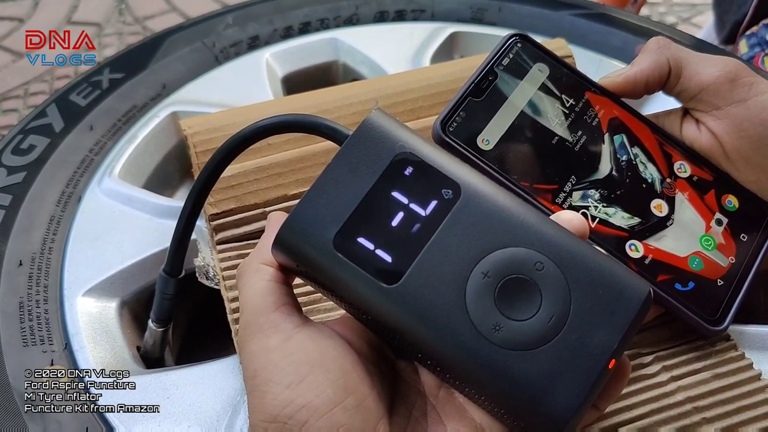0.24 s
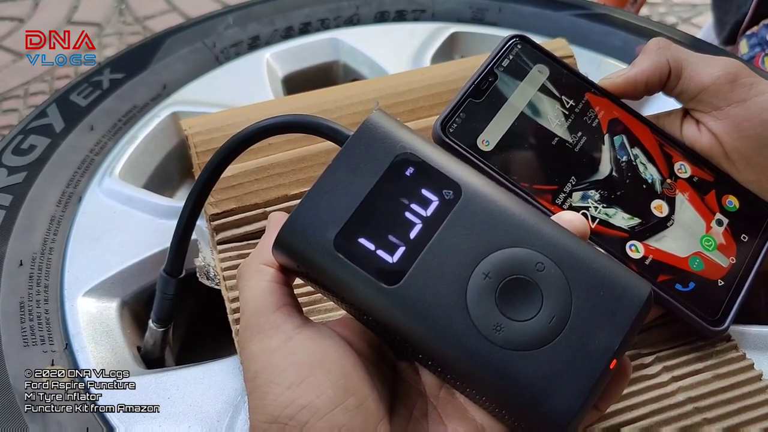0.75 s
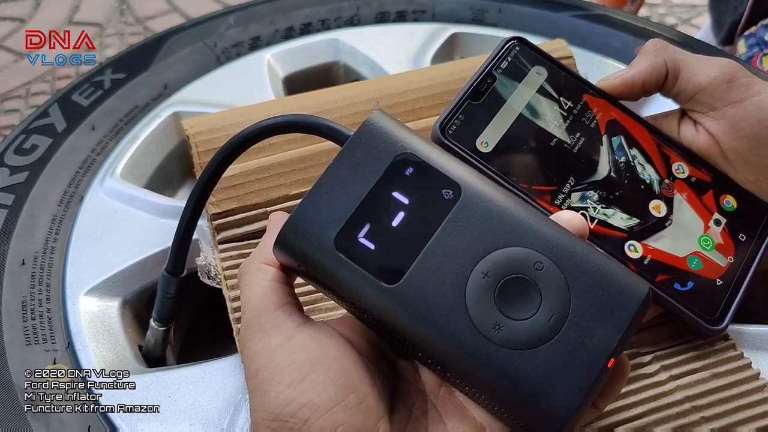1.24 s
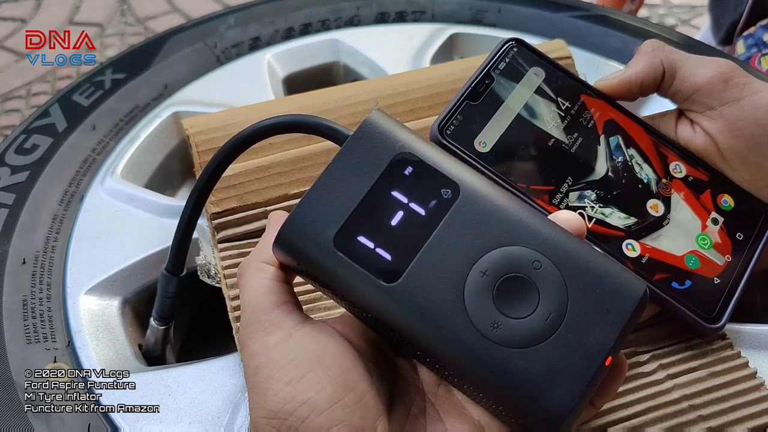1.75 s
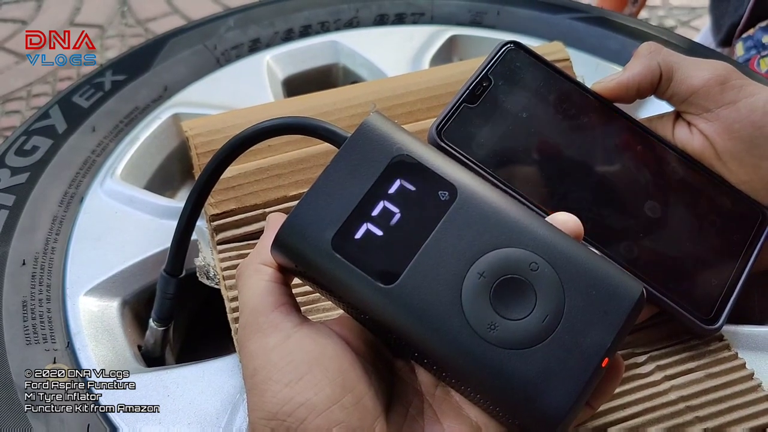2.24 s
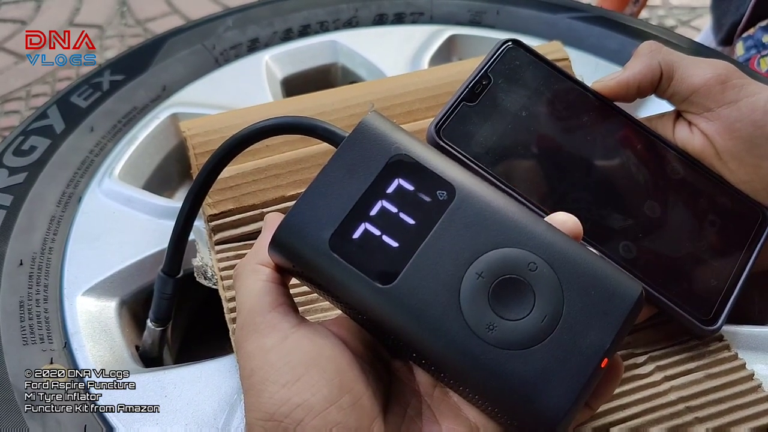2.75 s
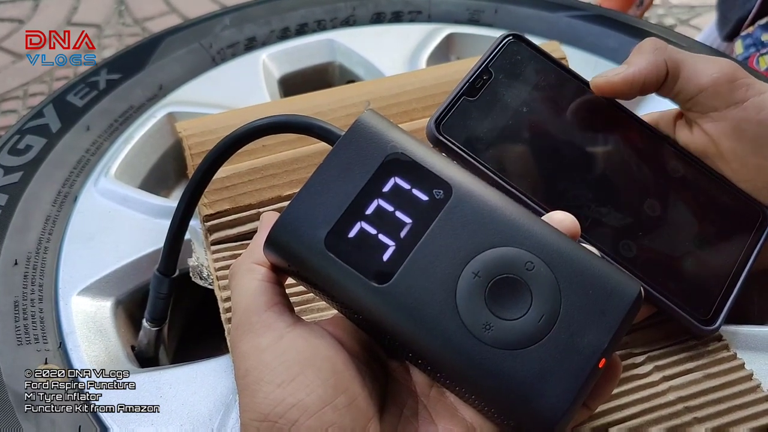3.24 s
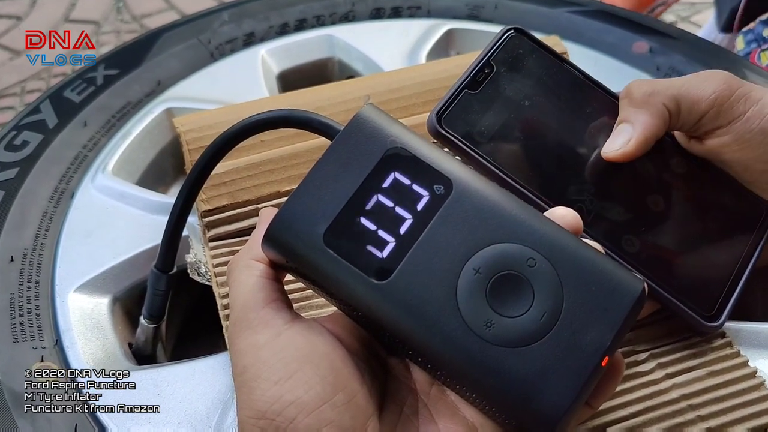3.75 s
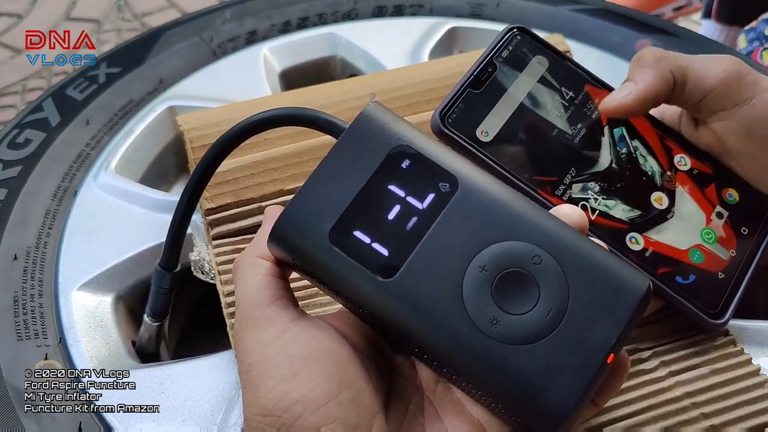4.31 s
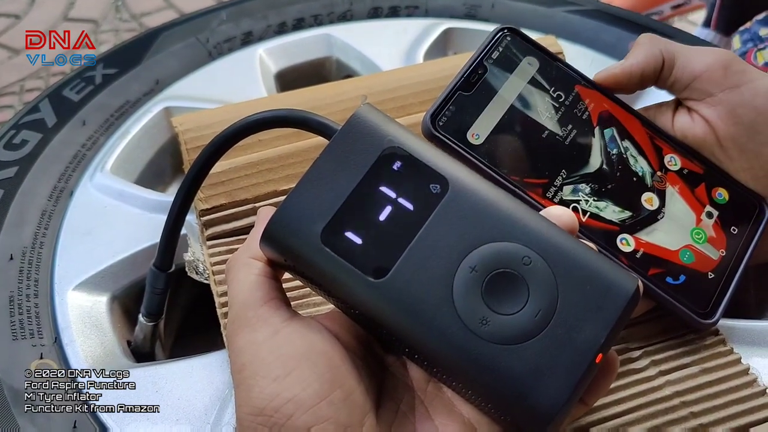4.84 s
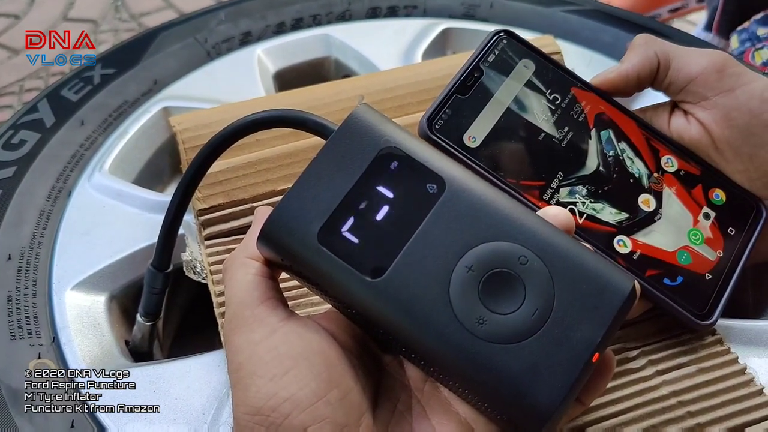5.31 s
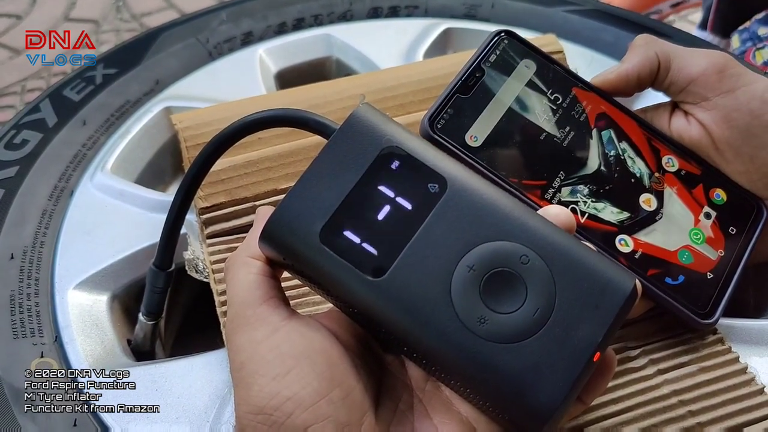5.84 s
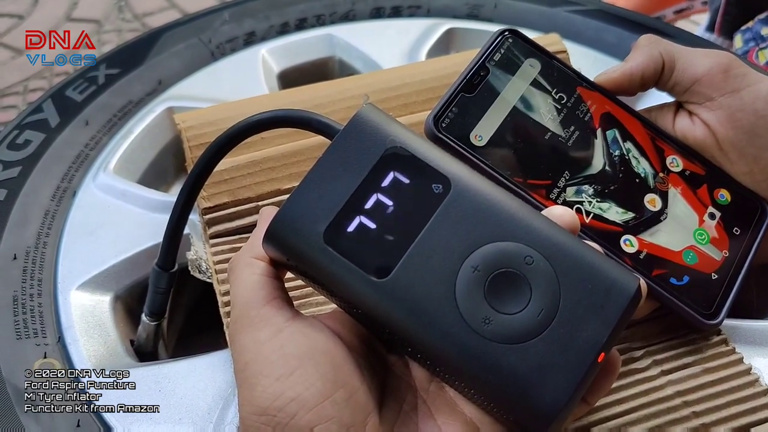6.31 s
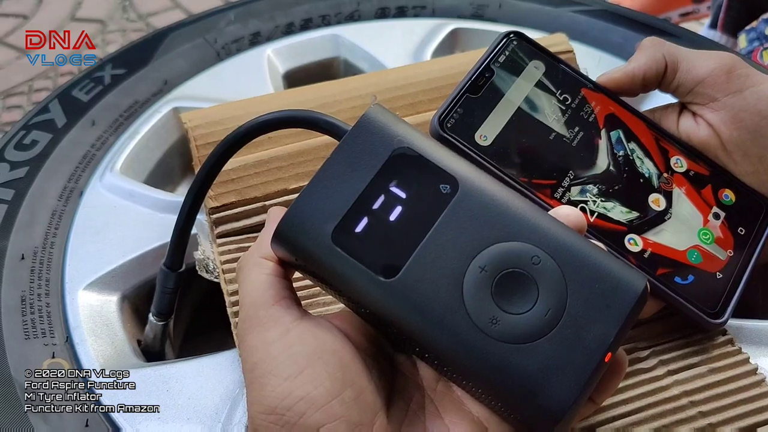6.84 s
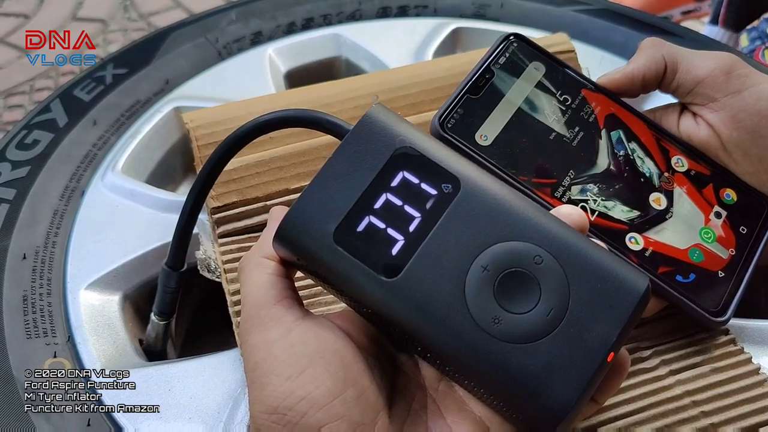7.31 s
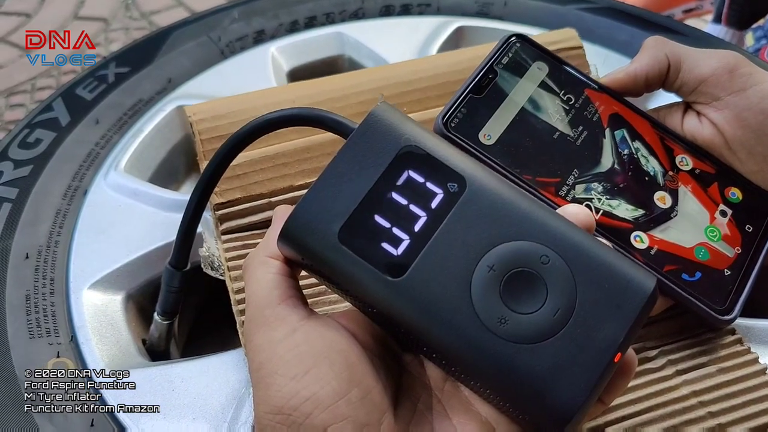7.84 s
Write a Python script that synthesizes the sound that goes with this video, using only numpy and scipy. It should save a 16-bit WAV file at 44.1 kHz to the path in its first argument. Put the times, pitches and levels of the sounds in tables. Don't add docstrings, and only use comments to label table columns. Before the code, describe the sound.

From 0 to 8 seconds a small hand-held tyre pump runs continuously, close to a stereo phone microphone in an open street. About thirty-two strokes a second fuse into a rough, nasal, rattling buzz. Every stroke has a fluttering reed that swells and drops in pitch, a sputtering wheeze of air, then a sharp valve slap with small bounces ringing a plastic case, brightest around two kilohertz. A faint low motor whine wavers beneath. The speed is almost fixed; the level rises noticeably until about 4 seconds, then a little more to the end. Far behind, an engine idles in the first half second, low exhaust hums pass near 1, 3.6, 5.9 and 7.4 seconds, and dull traffic rumble swells around 3, 5 and 6.5 to 8 seconds. The hiss is wide and grainy, with phone compression and no clear echo. It never stops.

```python
import sys
import numpy as np
from scipy import signal
from scipy.fft import rfft, irfft, next_fast_len
from scipy.io import wavfile
from scipy.ndimage import uniform_filter1d

SR = 44100
rng = np.random.default_rng(int(sys.argv[2]) if len(sys.argv) > 2 else 0)


def boost(x):
    u = np.asarray(x, float) / 20
    return 10 ** u


def wrap_up_sound(samples):
    columns = np.atleast_2d(samples).T
    tamed = np.clip(columns, -1, 1)
    steps = np.round(tamed * 32767).astype(np.int16)
    wavfile.write(sys.argv[1], SR, steps)


N = 355887

# (time [s], position [turns])
CRANK = [(0, 0.521), (1.8968, 61), (2.2737, 73), (2.6514, 85), (3.4081, 109), (3.786, 121), (4.5407, 145),
         (5.2969, 169), (6.8065, 217), (8.08, 257.538)]


def in_time(rows):
    s, *columns = np.transpose(rows)
    return [np.interp(np.arange(N) / SR, s, c) for c in columns]


def drift(rate, count):
    steps = int(N / SR * rate * 2) + 2
    place = np.linspace(0, steps - 1, N)
    chance = rng.standard_normal((count, steps))
    return np.array([np.interp(place, np.arange(steps), row) * 1.11 for row in chance])


def outside(start, length):
    t = np.arange(N) / SR
    return np.maximum(start - t, 0), np.maximum(t - start - length, 0)


def ring(clicks, hz, t60):
    r = boost(-60 / (t60 * SR))
    w = 2 * np.pi * hz / SR
    return signal.lfilter([0, np.sin(w)], [1, -2 * r * np.cos(w), r * r], clicks + 1e-18)


def resonance(x, hz, width_hz):
    r = np.exp(-np.pi * width_hz / SR)
    w = 2 * np.pi * hz / SR
    return signal.lfilter([(1 - r * r) / 2, 0, (r * r - 1) / 2], [1, -2 * r * np.cos(w), r * r], x)


def tone(hz, db):
    cycles = np.cumsum(hz * np.ones(N)) / SR + rng.random()
    return np.sqrt(2) * boost(db) * np.sin(2 * np.pi * cycles)


def valve(slap_db):
    # (time after the slap [ms], level [dB], timing scatter [ms])
    knocks = [
        (0, -1.5, .03),
        (2.344, -17, 0.12),
        (6.58, -17.5, 0.092),
        (8.61, -19, 0.071),
        (12.7, -18, .1),
        (16.315, -22.5, .1),
        (28.175, -11.5, 0.076),
    ]
    # (pitch [Hz], level [dB], t60 [s])
    case_modes = [(605, -18.5, 0.0034), (1001, -21.5, 0.037), (1136, -8, 0.017), (1458, -8.5, .009),
                  (1699, -1, 0.0061), (2272, 5.5, 0.0075), (2612, -6.5, .01), (2872, -20, 0.021)]
    seconds, turns = np.transpose(CRANK)
    slaps = np.interp(np.arange(1, turns[-1]), turns, seconds)
    clicks = np.zeros(N + SR)
    for ms, db, scatter_ms in knocks:
        chance = rng.standard_normal((len(slaps), 2))
        at = ((slaps + (ms + scatter_ms * chance[:, 0]) / 1e3) * SR).astype(int)
        clicks[at] -= boost(db + 0.57 * chance[:, 1])
    soft = signal.lfilter([.5, .5], [1, -.4], clicks[:N] * boost(slap_db))
    rung = sum(boost(db) * ring(soft, hz, t60) for hz, db, t60 in case_modes)
    no_bass = signal.butter(3, 340, "high", fs=SR, output="sos")
    return boost(7) * signal.sosfilt(no_bass, rung)


def reed(ms, turn, start_hz=1620, fall_hz_per_ms=22, loudest_ms=-5.5):
    since = ms - loudest_ms
    half_ms = np.where(since < 0, 2.6, 1.5)
    swell = 1 / (1 + (since / half_ms) ** 2)
    chance = rng.standard_normal((turn.max() + 1, 2))[turn]
    cycles = ((start_hz - 6 * fall_hz_per_ms) * since - fall_hz_per_ms * since ** 2 / 2) / 1e3
    angle = 2 * np.pi * (cycles + 0.036 * chance[:, 0])
    flutter = np.sin(angle) + .3 * np.sin(1.8 * angle)
    return boost(1 + 2 * chance[:, 1]) * swell * flutter


def air(ms, turn, gusts_db, sputter_db, jolt_ms):
    # (pitch [Hz], width [Hz], steady level [dB], wheeze [dB],
    # jolt after the slap [dB])
    air_paths = [(597, 290, -16.5, -8, 6), (936, 81, -15, 9.5, 8), (1212, 280, -17, 7, 6.5),
                 (1483, 160, -14.5, 6, 6), (1631, 150, -8.5, 8, 4), (1829, 300, -9.5, 5.5, 6),
                 (2125, 260, -8.5, 6.5, 4.5), (2434, 270, -8, 7, 10), (2851, 170, -13.5, 9.5, 2),
                 (3588, 640, -11.5, 1, 6),
                 (4845, 380, -14.5, 6.5, 3.5), (5527, 390, -10, 2, -4.5), (6115, 480, -6.5, 6, 5.5),
                (7030, 840, -12, 4.5, 1.5), (8234, 350, -14.5, 11.5, 3), (8715, 250, -16.5, 13, 1.5),
                (9824, 600, -15, 5, 5), (11020, 440, -23, 6.5, 7.5), (12000, 540, -23.5, 5.5, 4),
                (12770, 260, -25.5, 4.5, -1)]
    # (pitch [Hz], centre [ms], spread [ms])
    wheeze_times = [(605, 0.5, 3.3), (1030, -2, 2.4), (1567, -6, 3.1), (2500, -5, 3), (5980, -9, 6.5),
                    (9180, -7.5, 3.8), (11500, -6.5, 6)]
    paths = air_paths
    white = rng.standard_normal((2, 2, N))
    sputter = drift(260, count=3)
    gusts = rng.standard_normal((turn.max() + 1, 4))
    hush_db = -4 * np.exp(-((ms + 1.4) / .9) ** 2)
    tick_db = 4.5 * np.exp(-((ms + .9) / .6) ** 2)
    jolt = np.maximum(ms - .3, 0) / jolt_ms
    jolt = jolt * np.exp(1 - jolt)
    wheeze_hz, centres, spreads = np.transpose(wheeze_times)
    out = 0
    for k, (hz, width_hz, steady_db, wheeze_db, jolt_db) in enumerate(paths):
        region = 3 * k // len(paths)
        centre = np.interp(hz, wheeze_hz, centres)
        spread = np.interp(hz, wheeze_hz, spreads)
        wheeze = np.exp(-abs((ms - centre) / spread) ** 3)
        wheeze_part = wheeze * (wheeze_db + gusts_db * gusts[turn, region])
        jolt_part = jolt * (jolt_db + gusts_db * gusts[turn, 3])
        shutting_db = tick_db if hz > 3000 else hush_db
        gate = boost(steady_db + wheeze_part + jolt_part + shutting_db + sputter_db * sputter[region])
        once = resonance(white[k % 2] * gate, hz, 1.51 * width_hz)
        twice = resonance(once, hz, 1.51 * width_hz)
        out = out + twice * np.sqrt(SR / np.pi / width_hz)
    return out * boost(-0.5)


def machinery(turns):
    # (multiple of the crank rate, level [dB rms])
    shakes = [(2, -58), (4, -67), (6, -66), (8, -64), (29, -57)]
    # (pitch [Hz], level [dB rms])
    whines = [(153, -67.5), (266, -92), (312.5, -62), (344.3, -76.5)]
    out = 0
    for k, db in shakes:
        out = out + np.sqrt(2) * boost(db) * np.sin(2 * np.pi * (k * turns + rng.random()))
    wobble = drift(3.6, count=2)
    for hz, db in whines:
        out = out + tone(hz * (1 + 0.004 * wobble[0]), db + 1.5 * wobble[1])
    return out


def street():
    # (start [s], length [s], firing rate [Hz], level [dB rms])
    idling = [
        (-.2, 0.8, 25.58, -55),
        (2.6, 0.53, 26.3, -65),
    ]
    # (multiple of the firing rate, level [dB])
    idle_orders = [(2, -13), (3, -3), (4, -29), (5, -14), (6, -37)]
    # (loudest [s], held [s], first pitch [Hz], glide [Hz/s], level [dB rms])
    passing = [
        (.9, .06, 124.6, -14, -52.5),
        (3.57, 0.16, 121.5, -12, -50.5),
        (5.85, 0.28, 115.5, 53, -54),
        (7.301, 0.18, 123.4, -9, -54),
        (7.55, .5, 118, -4.5, -59.5),
    ]
    # (time [s], rise [dB], half length [s])
    swells = [
        (1.17, 1, .06),
        (2.977, 5, 0.33),
        (5.12, 9, .1),
        (5.75, 0, .1),
        (6.52, 5.5, 0.26),
        (6.93, 5, 0.1),
        (7.36, 6, 0.081),
        (7.853, 6.5, 0.11),
    ]
    t = np.arange(N) / SR
    engines = 0
    for start, length, hz, db in idling:
        faded = np.minimum(sum(outside(start, length)) / 0.18, 1)
        level_db = db + faded * (-82.5 - db)
        engines = engines + sum(tone(k * hz, level_db + up_db) for k, up_db in idle_orders)
    for start, held, hz, glide, db in passing:
        before, after = outside(start, held)
        engines = engines + tone(hz + glide * (t - start), db - 95 * before - 134 * after)
    low = signal.butter(2, [34, 100], "band", fs=SR, output="sos")
    wide = signal.butter(2, [90, 330], "band", fs=SR, output="sos")
    white = rng.standard_normal((2, 2, N))
    rumble_db = -61 + 2 * drift(2.2, count=1)[0]
    rumble_db = rumble_db + sum(db * np.exp(-((t - s) / half) ** 2) for s, db, half in swells)
    heavy = boost(rumble_db + 26.5) * signal.sosfilt(low, white[0])
    steady = boost(-38) * signal.sosfilt(wide, white[1])
    return engines, heavy + steady


def ports(locked, turbulence):
    # (pitch [Hz], likeness [0-1])
    likeness = [(50, .97), (300, .8), (1200, .74), (2050, .85), (4900, .9), (6200, .82), (9000, .76),
                (12200, .68)]
    # (pitch [Hz], lag [turns of the wave])
    port_lag = [(0, 0), (750, .095), (1700, .17), (1930, .45), (2120, .55), (2430, .96), (3300, 1.3),
                (4200, 2)]
    # (pitch [Hz], level [dB])
    balance = [(130, 0.3), (680, 1.8), (2000, 2.3), (2500, 2), (3300, 2), (6300, 6), (6900, 0.5),
               (12000, 1.3)]
    # (pitch [Hz], half width [Hz], likeness lost [0-1])
    scattered = [(1770, 120, .27), (2580, 130, .2), (3400, 500, .55), (4400, 200, .5), (7300, 900, .72),
                 (11300, 450, .52)]
    fft_size = next_fast_len(N)
    hz = np.fft.rfftfreq(fft_size, 1 / SR)
    alike, lag, balance_db = (np.interp(hz, *np.transpose(c)) for c in (likeness, port_lag, balance))
    alike = alike - sum(lost * np.exp(-((hz - centre) / half) ** 4) for centre, half, lost in scattered)
    alike = np.clip(alike, 0, 1)
    same = rfft(locked, fft_size)
    first, other = rfft(turbulence, fft_size)
    left = (same + first) * boost(balance_db / 2)
    right = same + alike * first + np.sqrt(1 - alike ** 2) * other
    right = right * boost(-balance_db / 2) * np.exp(-2j * np.pi * lag)
    return irfft([left, right], fft_size)[:, :N]


def scene():
    # (time [s], pump level [dB], valve slap against pump [dB])
    load_curve = [
        (0.0, -36, -3),
        (3.95, -32.5, -2.5),
        (8.07, -31, -3),
    ]
    turns, = in_time(CRANK)
    pump_db, slap_db = in_time(load_curve)
    turn = np.round(turns).astype(int)
    ms = (turns - turn) * 31.45
    load = boost(pump_db)
    engines, rumble = street()
    strokes = load * (valve(slap_db) + reed(ms, turn))
    shaking = machinery(turns) * boost(0.9 * (pump_db + 34.5))
    hiss = load * air(ms, turn, gusts_db=1.02, sputter_db=1.53, jolt_ms=1.3)
    return ports(strokes + shaking + engines, hiss + rumble)


def phone_rounding(x, size=1024, count=360):
    # (pitch [Hz], step against masking level [dB])
    coarseness = [(0, -22), (1300, -6), (2000, 4.5), (3000, 3), (4300, 7.5), (6000, 3.5), (7500, 6),
                  (13000, 7.5)]
    cutoff_hz, spill_hz = 13050, 14300
    bins, n = np.arange(int(spill_hz / SR * 2 * size)), np.arange(2 * size)
    hz = bins * SR / 2 / size
    window = np.sin(np.pi * (n + .5) / 2 / size)
    basis = np.cos(np.pi / size * np.outer(n + .5 + size / 2, bins + .5)) * window[:, None]
    blocks = np.pad([x[0] + x[1], x[0] - x[1]], ((0, 0), (2 * size - count, 3 * size)))
    blocks = blocks[:, :blocks.shape[1] // size * size].reshape(2, -1, size)
    lines = np.concatenate([blocks[:, :-1], blocks[:, 1:]], axis=2) @ basis
    power = (lines ** 2).mean(axis=0) * .6 + lines ** 2 * .4
    masking = uniform_filter1d(power, size=40, axis=2) ** .5
    budget = uniform_filter1d(rng.standard_normal(lines.shape), size=4, axis=1)
    rich = rng.random(lines.shape[1])[:, None] < .15
    band = np.where(bins < 290, bins // 8 * 8, bins // 16 * 16)
    step_db = np.interp(hz, *np.transpose(coarseness)) + 8 * budget[:, :, band] - 11 * rich
    step = masking[:, :, band] * boost(step_db) + 1e-9
    rounded = np.sign(lines) * np.floor(abs(lines) / step + .4) * step
    reaches_higher = rich & (budget[0, :, :1] > 0)
    rounded = rounded * ((hz < cutoff_hz) | reaches_higher)
    rounded = rounded * boost(-.032 * np.maximum(hz - cutoff_hz, 0))
    frames = rounded @ basis.T / size
    joined = (frames[:, 1:, :size] + frames[:, :-1, size:]).reshape(2, -1)
    total, difference = joined[:, size - count:][:, :N]
    return np.array([total + difference, total - difference])


def low_pass(x):
    return signal.sosfilt(signal.butter(12, 14370, fs=SR, output="sos"), x)


def record(dry):
    no_bass = signal.butter(2, 30, "high", fs=SR, output="sos")
    mix = phone_rounding(signal.sosfilt(no_bass, dry))
    return low_pass(mix)


dry = scene()
out = record(dry)
wrap_up_sound(out)
```